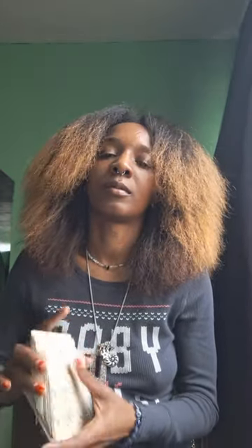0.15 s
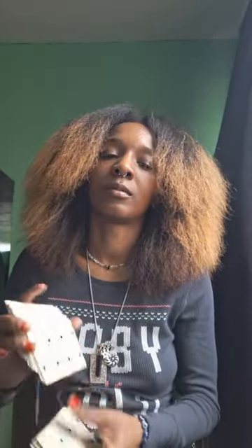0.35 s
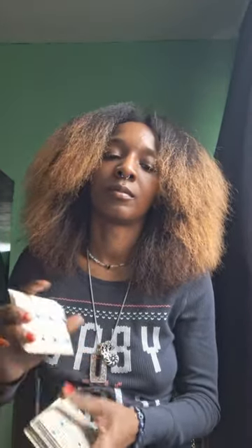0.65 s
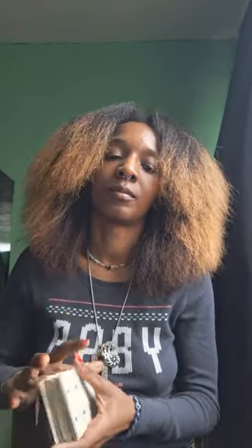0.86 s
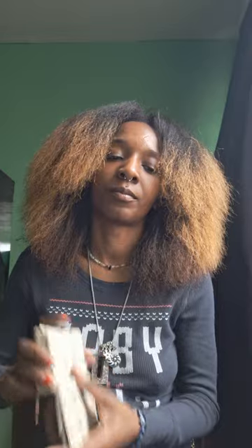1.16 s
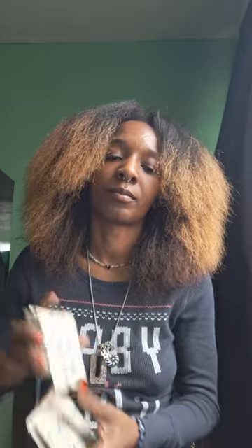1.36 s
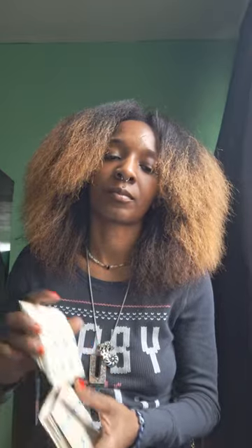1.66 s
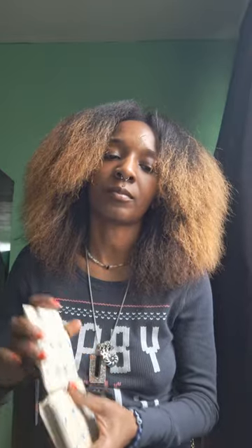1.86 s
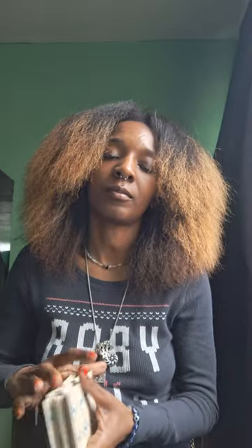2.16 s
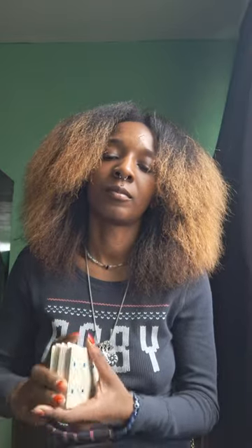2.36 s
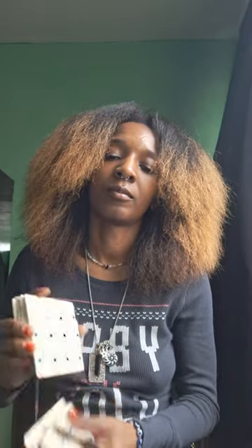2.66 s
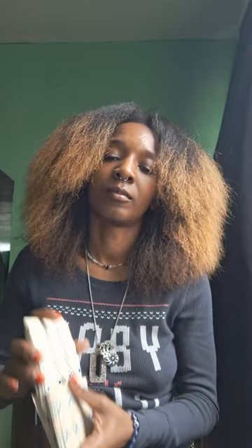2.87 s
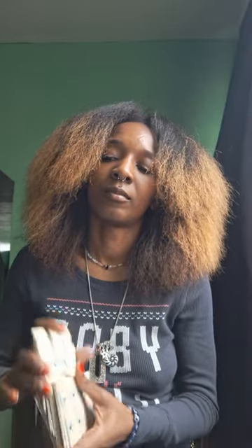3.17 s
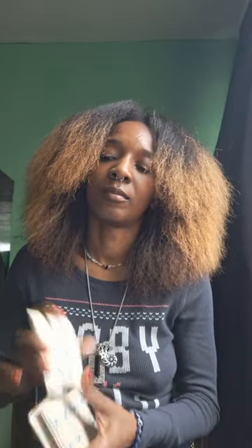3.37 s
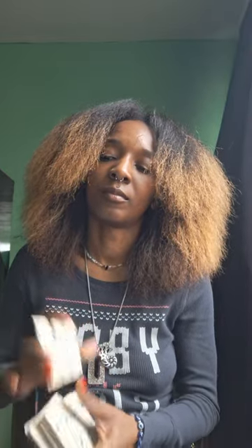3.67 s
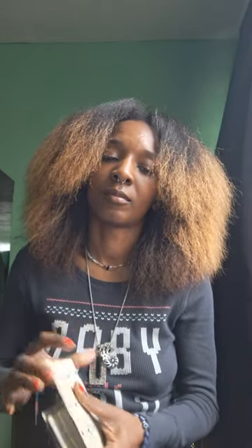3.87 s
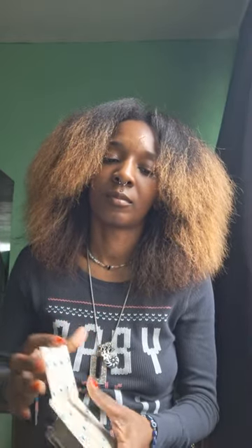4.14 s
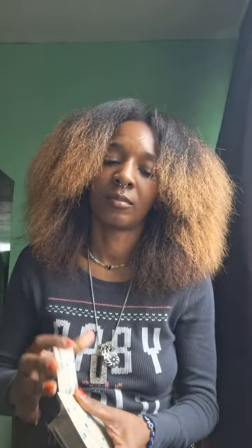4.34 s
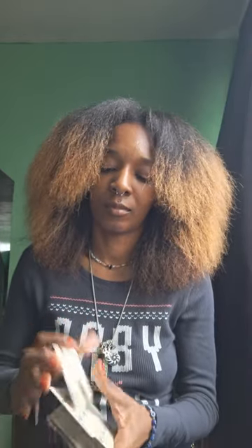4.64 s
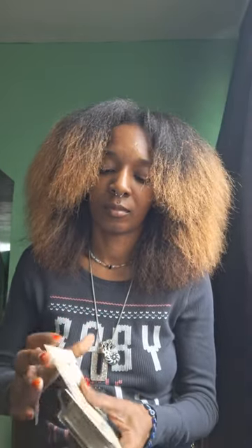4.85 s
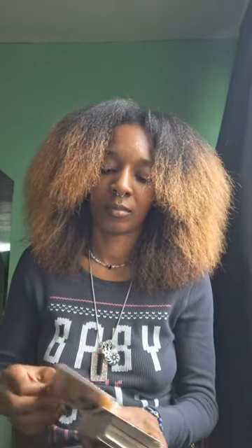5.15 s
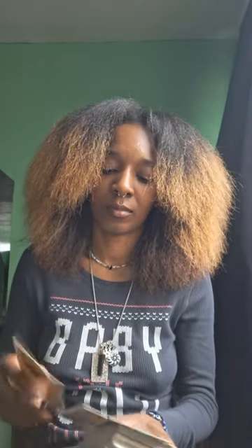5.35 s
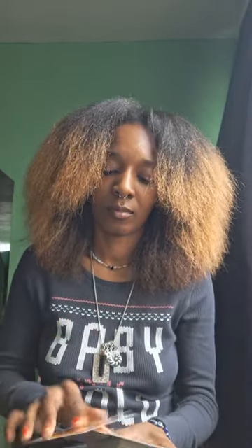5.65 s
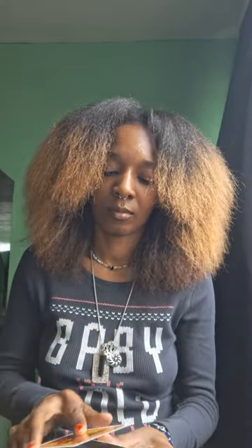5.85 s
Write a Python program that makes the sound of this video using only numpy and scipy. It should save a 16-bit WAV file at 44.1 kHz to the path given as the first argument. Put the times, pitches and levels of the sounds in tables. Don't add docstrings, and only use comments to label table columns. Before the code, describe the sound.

Very close to a phone microphone in a small quiet room, hands shuffle a deck of large coated cards overhand. Packets drop in irregular clusters of crisp papery taps, grainy sliding hiss and dull palm thuds. After four seconds it thins to a faint crackle, small ticks and a nail dragging off a corner; a last firm slap and soft rubs settle it. Faint hiss and low rumble lie underneath.

```python
import sys
import numpy as np
from scipy import signal
from scipy.fft import rfft, irfft
from scipy.io import wavfile
from scipy.ndimage import uniform_filter1d

SR = 44100
rng = np.random.default_rng(int(sys.argv[2]) if len(sys.argv) > 2 else 0)


def transcribe(u):
    v = np.clip(np.atleast_2d(u).T, -1, 1)
    q = np.round(v * 32767).astype(np.int16)
    wavfile.write(sys.argv[1], SR, q)


def invert_db(x):
    u = np.asarray(x, float) / 20
    return 10 ** u


N = 265041


def evened(x):
    return x / np.sqrt(np.mean(x ** 2) + 1e-20)


def read(points, hz):
    f, value = np.transpose(points)
    return np.interp(np.log(hz + 1), np.log(f + 1), value)


def along(rows):
    s, level = np.transpose(rows)
    return np.interp(np.arange(N) / SR, s, level)


def colour(x, points):
    n = x.shape[-1]
    gain = invert_db(read(points, np.fft.rfftfreq(n, 1 / SR)))
    return irfft(rfft(x) * gain, n)


def low_pass(x, hz):
    return signal.sosfilt(signal.butter(2, hz, fs=SR, output="sos"), x)


def band(x, lo_hz, hi_hz):
    return signal.sosfilt(signal.butter(2, [lo_hz, hi_hz], "band", fs=SR, output="sos"), x)


def add(mix, s, sound):
    part = mix[round(s * SR):][:len(sound)]
    part += sound[:len(part)]


# (time [s], peak level [dB], ring [Hz], ring level [dB], edge
# brightness [dB])
EDGE_SLAPS = [(0.025, -39, 5200, -6, 12), (0.032, -30.5, 3530, 4.5, -14), (0.2008, -29, 2700, -17.5, -38),
              (0.2092, -21.5, 1670, 1, -31), (0.2163, -41, 2080, 11.5, -24.5),
              (0.2232, -36.5, 1800, 13, -27), (0.2301, -22, 1970, -6, -33),
              (0.5475, -26.5, 1724, 5.5, -10.5), (0.8362, -29, 2420, -8, -12.5),
              (0.8683, -16.5, 3430, 1.5, -15), (0.8748, -24.5, 3150, 1.5, -7),
              (1.2916, -29.5, 1242, 3, -11), (1.495, -34, 1570, -2.5, -11), (1.801, -39, 1760, 4, -21),
              (1.8173, -43, 1800, 11.5, -30), (1.9575, -36.5, 3420, 3, -36),
              (2.1273, -35.5, 2940, -1, -29), (2.143, -38, 2861, 11, -27), (2.1667, -37, 4660, 1.5, -5),
              (2.6575, -27, 1660, 0.5, -6.5), (2.8373, -34.5, 2010, 8, -14),
              (2.8441, -23.5, 2050, -6, -34), (2.855, -26, 2090, -9, -20), (3.169, -32.5, 1590, 6, -20),
              (3.1772, -25, 4660, 12, -5), (3.184, -34.5, 3850, 17, -10), (3.4695, -24, 1615, -2.5, -55),
              (3.5205, -50, 2120, -9, 13), (3.5275, -38, 2865, 5.5, 1.5), (4.728, -38.5, 2610, 3.5, -3),
              (5.625, -36, 3040, 1.5, -4), (5.7016, -29.5, 2510, 5, -9), (5.7105, -28.5, 2840, 7, -32),
              (5.7413, -38.5, 2900, 12.5, -35),
              (0.017, -44.5, 5000, -10, 10), (0.2112, -28, 1710, 11, -26), (0.2228, -23, 5600, 5, -11),
               (0.2252, -34.5, 1840, 11, -33), (0.535, -35, 5130, 5, -9), (0.5372, -38, 2000, 0, -22),
               (0.5605, -36, 1790, 9, -27), (0.5625, -24.5, 6030, -2, -23), (0.8385, -37, 3770, 7, -11),
               (0.8662, -38, 3520, -9, -10), (0.8775, -27.5, 3000, 5, -25), (1.3085, -44, 1880, -7, -20),
               (1.5, -35, 4000, -4, -17), (1.5022, -44, 1800, 5, -25), (1.508, -36, 2300, 1, -10),
               (2.1205, -50, 1800, 3, -13), (2.1735, -36, 4940, -2, 2), (2.6485, -38.5, 1590, 3.5, -7),
               (2.664, -41, 2930, 9, -17), (2.829, -32, 2260, -1, -13), (2.833, -35, 2200, 8, -25),
               (2.8415, -30, 1720, 0.5, -5), (2.861, -25.5, 4400, 4, -13), (2.868, -34, 1900, 0, -18),
               (3.476, -40, 2240, 0, -10), (3.484, -37, 2000, 1, -25), (3.535, -44, 3500, -4, 6),
               (0.879, -29, 2340, 7.5, -30), (0.891, -43, 2410, 10, -30.5), (2.8461, -37, 1590, 4, -25),
               (3.178, -34, 2200, 11.5, -30), (3.187, -29, 2210, 4.5, -26.5),
               (5.7198, -35, 3000, 10, -22.5), (1.8071, -47, 1760, 12, -22), (3.935, -60, 4500, 9, -17)]
# (time [s], peak level [dB], ring [Hz], edge brightness [dB])
CARD_TICKS = [(0.5292, -36.5, 1750, -18), (0.632, -49, 1480, -43), (1.287, -30.5, 5000, -10),
              (1.479, -46.5, 1230, -4), (1.5537, -53, 2340, -29), (1.641, -58, 3360, -29),
              (1.895, -43, 1720, -29), (2.397, -60, 2960, -27), (2.429, -50, 4570, -1),
              (2.77, -54, 4140, -9), (2.9167, -55, 2000, -18), (3.066, -44.5, 4920, -26),
              (3.136, -41, 1720, -33.5), (3.151, -44, 2080, -30), (3.1433, -39, 2070, -35),
              (3.162, -42, 2200, -17.5), (3.222, -39.5, 1580, -35), (3.3165, -41, 3460, -13),
              (3.774, -46, 6500, -17), (3.827, -50, 2030, -24), (3.8335, -47, 1850, 6),
              (4.027, -45, 4280, -8), (4.3025, -46.5, 4130, -9), (4.398, -64, 6500, -9),
              (4.413, -47.5, 7070, -19), (4.5297, -64, 6800, -24.5), (4.804, -48, 2300, -2),
              (5.097, -46, 5800, -17), (5.437, -41.5, 2320, -29), (4.96, -55, 1110, -35),
              (0.039, -40, 3470, -24.5), (0.2092, -18.5, 5100, -17.5), (0.235, -21, 2870, -31.5),
              (1.2941, -30, 1880, -26), (1.434, -65, 4440, -21), (4.919, -54, 5370, -7),
              (0.845, -35, 2400, -20), (0.882, -35.5, 2680, -15.5), (1.84, -29, 4460, -12),
              (1.9636, -44, 3360, -20), (1.985, -62, 7400, -13), (2.154, -29, 1630, -23),
              (2.174, -33, 1790, -29), (5.633, -37, 4560, -3), (5.641, -42, 2480, -12),
              (5.7157, -20.5, 4700, -42)]
# (time [s], peak level [dB], ring [Hz])
PRY_CRACKLES = [(4.167, -56, 1200), (4.1675, -49, 3000), (4.174, -48.5, 2950), (4.181, -50, 3380),
                (4.188, -51, 2970), (4.196, -56, 3460), (4.203, -51, 950), (4.21, -52, 1620),
                (4.217, -52, 1300), (4.2232, -40.5, 1630), (4.2305, -38, 3300), (4.238, -64, 2250),
                (4.244, -53, 1300), (4.247, -42, 3500), (4.255, -47, 3900), (4.294, -63, 1780)]
# (frequency [Hz], level
# [dB per Hz])
PORT_COLOUR = [(200, -5.5), (700, -6), (1000, -8), (1500, -1), (2200, 0.5), (3000, 0), (5000, 2),
               (7000, -2), (7700, -8), (8300, -15.5), (9500, -12), (12000, -7), (15600, -4), (16200, -64)]


def taps(crack_ms=2.7, ring_cycles=4.32, ring_rise_ms=0.45, edge_ms=0.94, edge_gain_db=3.5):
    out, t = np.zeros(N), np.arange(1024) / SR
    crack_shape = np.exp(-t * 1000 / crack_ms) * np.minimum(t / 0.00026, 1)
    edge_shape = invert_db(edge_gain_db) * np.exp(-t * 1000 / edge_ms) * np.minimum(t / 0.00021, 1)
    tick_ring_db, crackle_edge_db = 2, -37
    rows = EDGE_SLAPS
    rows = rows + [(s, db, hz, tick_ring_db, edge_db) for s, db, hz, edge_db in CARD_TICKS]
    rows = rows + [(s, db, hz, tick_ring_db, crackle_edge_db) for s, db, hz in PRY_CRACKLES]
    noises = rng.standard_normal((len(rows), 2, 1024))
    for (s, peak_db, hz, ring_db, edge_db), noise in zip(rows, noises):
        paper = colour(noise[0], PORT_COLOUR)
        face_gain = invert_db(0.39 * (edge_db + 18.5))
        crack = band(paper, 500, 4200) + face_gain * band(paper, 4200, 11000)
        crack = crack / np.std(band(paper, 500, 11000))
        edge = invert_db(edge_db) * evened(band(noise[1], 8300, 16500))
        sway = np.sin(2 * np.pi * hz * t + noise[1, 0])
        sway = sway + 0.49 * np.sin(2 * np.pi * hz * 1.244 * t + 2 * noise[1, 1])
        ring = sway * np.exp(-t * hz / ring_cycles) * (1 - np.exp(-t * 1000 / ring_rise_ms))
        tap = crack * crack_shape + edge * edge_shape + 1.47 * invert_db(ring_db) * ring
        add(out, s - 0.0005, invert_db(peak_db - 2.5) * tap)
    return out


# (time [s], rise [s], effort level [dB], fade [dB per s], brightness [dB])
SKID_LANDINGS = [(0.0, 0.0066, -56, 260, 14.5), (0.023, 0.014, -50.5, 267, -5.5),
                 (0.199, 0.03, -44.5, 170, -2.5), (0.5287, 0.024, -46, 196, -0.5),
                 (0.834, 0.045, -43, 373, -0.5), (1.064, 0.001, -71, 287, 3), (1.267, 0.0066, -65, 260, 16),
                 (1.279, 0.0047, -47, 318, 0), (1.4817, 0.015, -48.5, 187, -2),
                 (1.796, 0.011, -52, 198, -2), (2.1265, 0.046, -44, 355, -1), (2.627, 0.026, -40, 495, 1.5),
                 (2.769, .003, -80.5, 480, 18.5), (2.827, 0.026, -40, 176, 0.5),
                 (3.138, 0.012, -62, 211, -2), (3.157, 0.013, -40, 222, 2), (3.31, 0.0017, -58.5, 282, 3),
                 (3.467, 0.071, -47, 419, -2), (4.166, 0.078, -69.5, 340, -16.5),
                 (4.29, 0.0025, -64, 306, -9), (4.411, 0.0038, -69.5, 353, -8),
                 (4.528, 0.0026, -63, 409, -4.5), (4.725, 0.002, -56, 156, -1),
                 (5.098, 0.0036, -80, 445, 21.5), (5.433, 0.0025, -48.5, 378, 0),
                 (5.6245, 0.0016, -49, 248, -2.5), (5.7, 0.013, -39, 333, -1)]
# (time [s], swell [s], effort level [dB], hold [s], brightness [dB])
PACKET_DRAWS = [(0.285, 0.04, -57, 0.04, -1), (0.34, 0.072, -65, 0.17, -8.5), (1.322, .02, -77, 0.16, 1),
                (1.655, 0.031, -63.5, 0.017, 1), (2.417, 0.012, -70, 0.034, 3),
                (3.065, 0.096, -53.5, 0.017, 3), (4.795, 0.042, -87, 0.04, 24.5),
                (1.126, 0.11, -73, 0.04, 19.5), (1.496, 0.061, -56, 0.088, 0.5),
                (1.803, 0.015, -49.5, 0.17, -1), (2.338, 0.053, -71, 0.037, 3.5),
                (2.488, 0.11, -57.5, 0.032, 9.5), (2.939, 0.063, -68.5, 0.039, 16.5),
                (3.773, .003, -62.5, 0.092, 3.5), (3.813, 0.14, -62.5, 0.087, 7.5),
                (4.911, 0.015, -72, 0.0061, -6), (4.975, 0.049, -67, 0.0086, -3),
                (5.138, 0.094, -84.5, 0.28, 24), (5.282, 0.11, -70, 0.022, 18), (5.656, 0.035, -54, .01, 0),
                (5.814, 0.073, -65.5, 0.04, -1), (5.973, 0.029, -66, 0.022, -1.5)]


def effort(touch_db, fade_share, lean):
    t, power = np.arange(0, N, 32) / SR, 1e-12
    for s, rise, db, fade, bright_db in SKID_LANDINGS:
        shape_db = touch_db * np.clip(1 - (t - s) / rise, 0, 1)
        shape_db = shape_db - fade_share * fade * np.maximum(t - s - rise, 0)
        power = power + (t >= s) * invert_db(db + lean * bright_db + shape_db) ** 2
    draw_start_db, sag_db_per_s, lift_db_per_s = -22, 57, 322
    for s, swell, db, hold, bright_db in PACKET_DRAWS:
        late = np.maximum(t - s - swell, 0)
        shape_db = draw_start_db * np.clip(1 - (t - s) / swell, 0, 1)
        shape_db = shape_db - sag_db_per_s * late - lift_db_per_s * np.maximum(late - hold, 0)
        power = power + (t >= s) * invert_db(db + lean * bright_db + shape_db) ** 2
    return np.interp(np.arange(N) / SR, t, np.sqrt(power))


def sliding(flicker_db=2.0, slips_per_s=700, slip_db=4.5):
    sizes = invert_db(slip_db * np.minimum(rng.exponential(1, N), 3))
    slips = sizes * (rng.random(N) < slips_per_s / SR) * rng.choice([-1, 1], N)
    clumps = invert_db(flicker_db * evened(uniform_filter1d(rng.standard_normal(N), 130)))
    grain = evened(rng.standard_normal(N) + 0.5 * evened(slips))
    rub = colour(grain * clumps, PORT_COLOUR)
    face = band(band(rub, 3000, 7760), 1900, 7860) / np.std(band(rub, 4840, 6150))
    edge = invert_db(1) * evened(band(rub, 7630, 22000))
    body = invert_db(-4.5) * evened(band(rub, 350, 2086))
    mix = effort(touch_db=-8, fade_share=1, lean=0) * face
    mix = mix + effort(touch_db=-7, fade_share=1.22, lean=1) * edge
    mix = mix + effort(touch_db=-7, fade_share=0.78, lean=-1) * body
    return invert_db(6.5) * mix


# (time [s], peak level [dB], pitch [Hz])
PALM_THUDS = [(0.031, -55.5, 318), (0.219, -45.5, 185), (0.539, -51, 226), (0.872, -43, 137.5),
              (1.29, -40, 151), (1.501, -46, 172), (1.818, -55, 169), (1.96, -57, 169.5),
              (2.149, -47, 164.5), (2.655, -49, 165), (2.834, -44, 175), (2.868, -40.5, 165),
              (2.923, -47, 149), (3.166, -61, 232), (3.469, -44.5, 157), (3.528, -62, 182),
              (4.166, -53, 187), (4.3, -55, 169), (4.531, -54, 168), (4.63, -56.5, 195.4),
              (4.726, -48, 175.5), (4.806, -47.5, 180), (4.964, -49, 212), (5.03, -49.5, 229),
              (5.095, -55, 188), (5.438, -43.5, 157.6), (5.452, -45, 198), (5.623, -45.5, 174),
              (5.704, -37, 235), (5.738, -45, 266), (5.839, -63, 198)]


def thuds(t60=0.19):
    out, t = np.zeros(N), np.arange(8192) / SR
    noises = rng.standard_normal((len(PALM_THUDS), 8192))
    for (s, peak_db, hz), noise in zip(PALM_THUDS, noises):
        blow = np.sin(2 * np.pi * hz * t) + 0.44 * evened(band(noise, 150, 475))
        add(out, s, invert_db(peak_db - 2.0 - 60 * t / t60) * blow * np.minimum(t / 0.00037, 1))
    return out


# (time [s], length [s], level [dB], first [Hz], last [Hz])
SLOT_WHISTLES = [(2.286, 0.21, -68.5, 8600, 6800), (2.309, 0.12, -64.5, 7200, 6200),
                 (2.49, 0.2, -60, 5900, 7600), (3.348, 0.097, -69, 7200, 5650),
                 (3.762, 0.21, -62, 7750, 7000), (1.815, 0.045, -45, 6000, 7600),
                 (5.377, 0.058, -53.5, 4200, 3700), (5.842, 0.11, -63, 2700, 2450),
                 (3.718, 0.054, -76, 3800, 4060)]


def whistles():
    out = np.zeros(N)
    for s, length, level_db, first_hz, last_hz in SLOT_WHISTLES:
        u = np.arange(0, length, 1 / SR) / length
        width_hz = 300 + 60 * max(level_db + 72, 0)
        slow = low_pass(rng.standard_normal((2, SR // 2)), width_hz / 2)[:, :len(u)]
        turn = 2 * np.pi * np.cumsum(first_hz + (last_hz - first_hz) * u) / SR
        tone = evened(slow[0] * np.cos(turn) + slow[1] * np.sin(turn))
        add(out, s, invert_db(level_db - 14 * (2 * u - 1) ** 4) * tone)
    return out


# (time [s], level [dB])
NAIL_SLIPS = [(5.008, -51), (5.03, -61)]
# (frequency [Hz], level [dB], t60 [s])
CORNER_MODES = [(1253, 5, 0.024), (2050, 1.5, 0.022), (3430, 1, 0.025), (5100, 1, 0.036), (7500, 0, 0.014)]


def nail(rise_ms=4.2, sag=0.05, waver=0.4):
    out, t = np.zeros(N), np.arange(4096) / SR
    bent_t = t + sag * (0.009 * (1 - np.exp(-t / 0.012)) - 0.5 * t)
    for s, level_db in NAIL_SLIPS:
        noise = rng.standard_normal((len(CORNER_MODES), 4096))
        shake = 1 + waver * evened(uniform_filter1d(noise, size=90, axis=1))
        ring = np.zeros(4096)
        for (hz, db, t60), wobble in zip(CORNER_MODES, shake):
            ring += invert_db(db - 60 * t / t60) * wobble * np.sin(2 * np.pi * hz * bent_t)
        add(out, s, invert_db(level_db + 7.5) * ring * np.minimum(t * 1000 / rise_ms, 1) ** 2)
    return out


# (delay [s], level [dB])
WALL_ECHOES = [(.0071, -7), (0.0129, -15), (0.0228, -15)]


def flutter(x):
    echoes = np.zeros(1500)
    echoes[0] = 1
    for delay, db in WALL_ECHOES:
        smear = rng.standard_normal(60) * np.exp(-np.arange(60) / 2.3)
        add(echoes, delay, invert_db(db) * smear / np.linalg.norm(smear))
    return signal.oaconvolve(x, echoes)[:N]


# (time [s], left minus right level [dB])
HAND_PATH = [(0.0, -12), (0.17, -12), (0.97, -12), (2.38, -10.5), (2.43, -16), (2.76, -10), (5.31, -13.5),
             (5.64, -8), (6.01, -16.5)]
# (frequency [Hz], level [dB])
LEFT_SHADOW = [(200, 10), (500, 3), (1000, 1), (2200, 2.5), (3000, -3), (4000, -3), (6000, -4.5),
               (7600, -1), (8400, 12), (9500, 2.5), (10500, -4.5), (12000, -9.5), (15000, -14)]


def ports(x, scatter=0.63, turns_per_s=2.3):
    lag = 5
    late = np.zeros((3, 256))
    late[:, lag:] = scatter * rng.standard_normal((3, 256 - lag)) * np.exp(-np.arange(256 - lag) / 120)
    turn = 2 * np.pi * (turns_per_s * np.arange(N) / SR + np.arange(3)[:, None] / 3)
    scattered = (np.cos(turn) * signal.oaconvolve(x[None], late, axes=1)[:, :N]).sum(0)
    left = colour(np.roll(x, lag) + scattered, LEFT_SHADOW)
    return np.array([left * invert_db(along(HAND_PATH) - 11.5), x])


# (frequency [Hz], t60 [s])
ROOM_T60 = [(250, 0.24), (1000, 0.31), (4000, 0.24), (8800, 0.2), (16000, 0.069)]


def room(x):
    echoes = np.zeros((2, SR // 2))
    at = np.arange(200, SR // 2 - 20, 20)
    at = at + rng.integers(0, 20, (2, len(at)))
    np.put_along_axis(echoes, at, rng.choice([-1., 1.], at.shape), 1)
    hz, t, z = signal.stft(echoes, SR, nperseg=256)
    fade = invert_db(-60 * t / read(ROOM_T60, hz)[:, None])
    tail = signal.istft(z * fade, SR, nperseg=256)[1]
    return signal.fftconvolve(x, tail / np.linalg.norm(tail[0]), axes=1)[:, :N]


# (frequency [Hz], level [dB per Hz])
LEFT_HISS = [(400, -4.5), (700, -34), (1100, -31), (2200, -27), (5000, -25), (6000, -24), (7000, -17.5),
             (15500, -19), (16500, -59.5)]
RIGHT_HISS = [(400, -9), (700, -5.5), (1100, -12), (2500, -17.5), (7000, -5.5), (7600, -8), (8200, -25),
              (9500, -16.5), (14000, -9), (15500, -12.5), (16100, -49.5)]


def hiss(level_db=-52, settle_db=-3.5, settle_s=0.12, patchy_db=1.5):
    a, b = rng.standard_normal((2, N))
    t = np.arange(N) / SR
    starts = np.sort([row[0] for row in SKID_LANDINGS + PACKET_DRAWS])
    rest = t - starts[np.maximum(np.searchsorted(starts, t, "right") - 1, 0)]
    top = invert_db(settle_db * (3.5 - np.exp(-(rest / settle_s) ** 2)))
    air = np.array([colour(a, LEFT_HISS), colour(b, RIGHT_HISS)])
    z = signal.stft(air, nperseg=512)[2]
    patches = uniform_filter1d(rng.standard_normal(z.shape[1:]), size=9, axis=0)
    patches = uniform_filter1d(patches, size=14, axis=1)
    air = signal.istft(z * invert_db(patchy_db * evened(patches)), nperseg=512)[1][:, :N]
    return invert_db(level_db) * (air + (top - 1) * band(air, 1500, 20000))


# (frequency [Hz], level [dB per Hz])
RUMBLE_COLOUR = [(20, -31.5), (40, -7.5), (60, -1), (80, -8), (88, 0), (96, 6.5), (105, -3.5), (117, -5),
                 (132, -21.5), (160, -6.5), (195, -14), (235, -14), (300, -21.5), (400, -48), (700, -34.5),
                 (1100, -38)]
# (time [s], level [dB])
RUMBLE_SWELL = [(0.0, -43), (0.12, -55), (0.42, -51), (0.47, -57.5), (0.77, -56), (0.95, -64),
                (1.24, -53.5), (1.39, -59), (2.36, -59), (2.6, -57), (3.46, -58), (3.51, -51.5),
                (3.7, -64.5), (3.9, -56.5), (4.3, -60), (5.5, -60), (5.75, -54), (6.01, -62.5)]
# (frequency [Hz], left-right likeness [0 to 1])
PORT_LIKENESS = [(30, 0.81), (130, 0.96), (290, 0.93), (640, 0.4), (1100, .1)]


def rumble():
    a, b = rfft(rng.standard_normal((2, N)))
    same = np.clip(read(PORT_LIKENESS, np.fft.rfftfreq(N, 1 / SR)), -1, 1)
    pair = irfft(np.array([same * a + np.sqrt(1 - same ** 2) * b, a]), N)
    low = low_pass(colour(pair, RUMBLE_COLOUR), 1500)
    return invert_db(along(RUMBLE_SWELL) + 5.0) * evened(low) * invert_db(np.array([[0.8], [-0.8]]))


def scene():
    hits = ports(flutter(taps() + nail()))
    rub = sliding()
    rub = ports(0.22 * flutter(rub) + 0.44 * rub + whistles())
    blows = flutter(thuds()) * invert_db(np.array([[-0.5], [0.5]]))
    tail = room(invert_db(-13.5) * (hits + blows) + invert_db(-23.5) * rub)
    return hits + rub + blows + tail + hiss() + rumble()


def band_limit(x):
    return signal.sosfilt(signal.butter(12, 16990, fs=SR, output="sos"), x)


# (frequency [Hz], level [dB])
MIC_EDGE = [(15800, -1), (16100, -20), (17000, -26), (17300, -70)]


def record(dry):
    mix = colour(dry, MIC_EDGE)
    return band_limit(mix)


dry = scene()
out = record(dry)
transcribe(out)
```